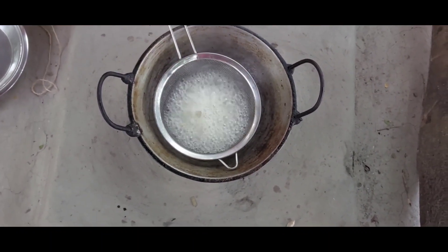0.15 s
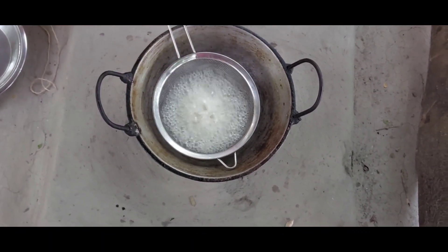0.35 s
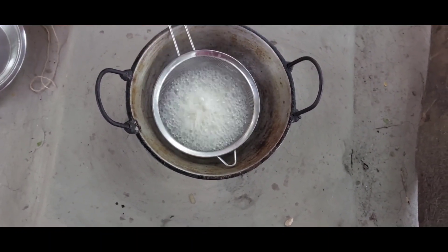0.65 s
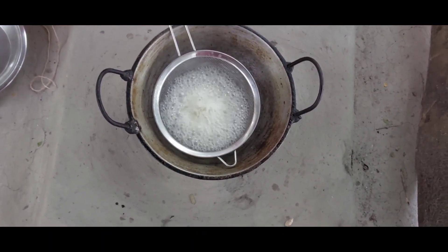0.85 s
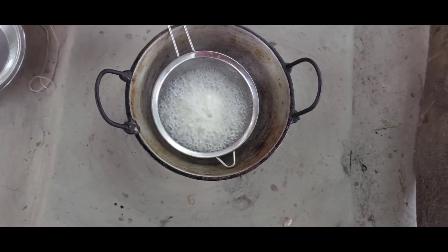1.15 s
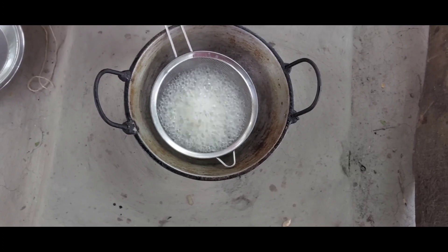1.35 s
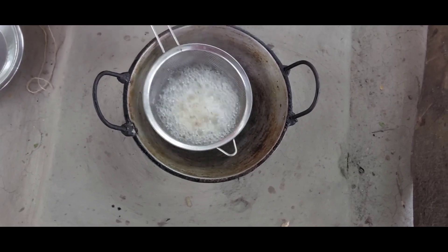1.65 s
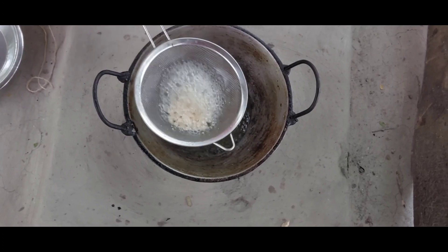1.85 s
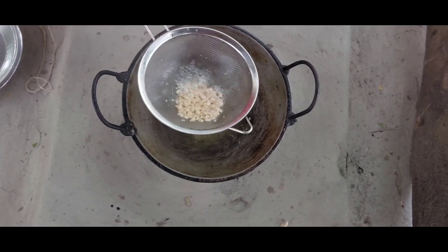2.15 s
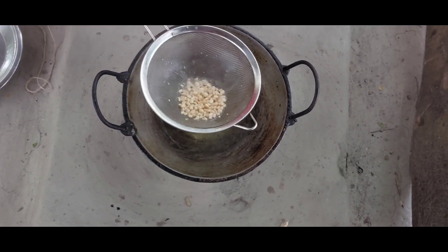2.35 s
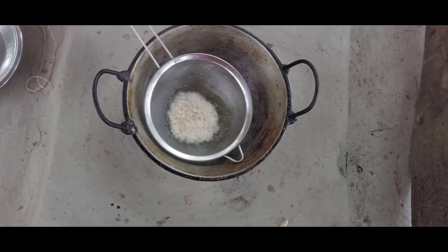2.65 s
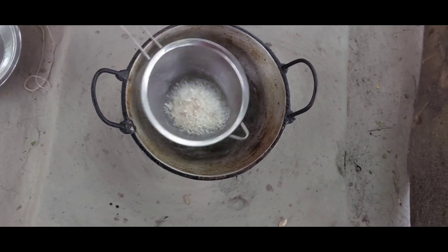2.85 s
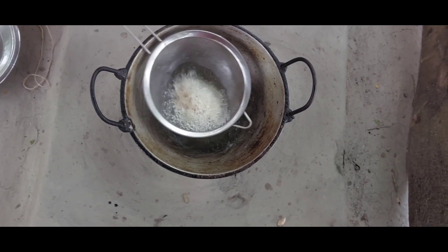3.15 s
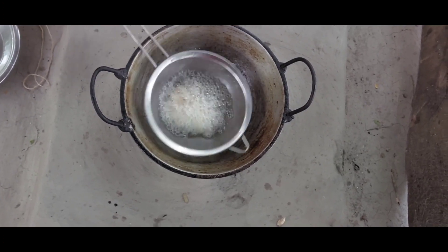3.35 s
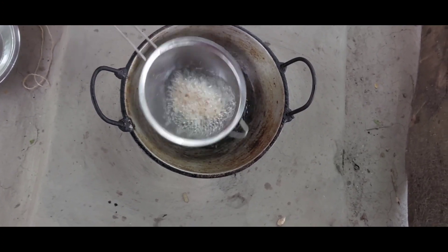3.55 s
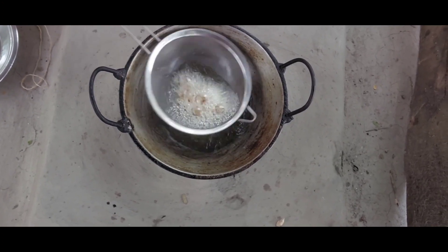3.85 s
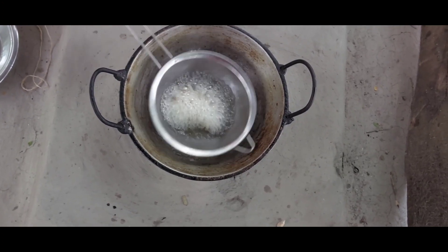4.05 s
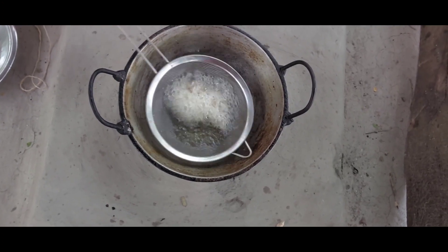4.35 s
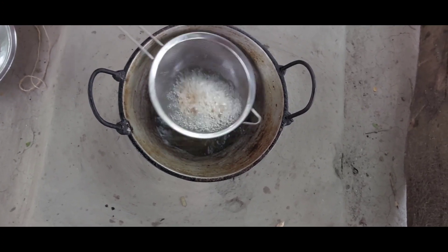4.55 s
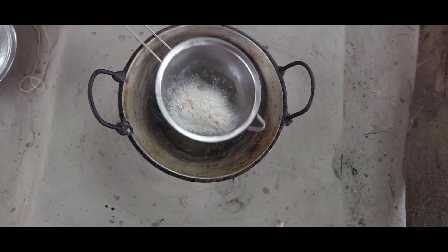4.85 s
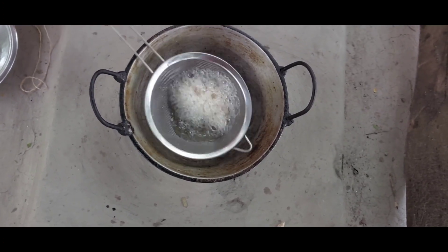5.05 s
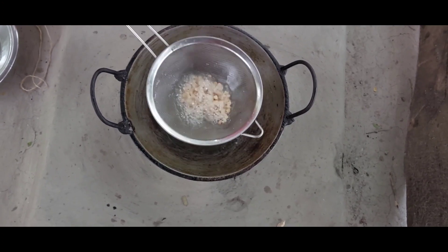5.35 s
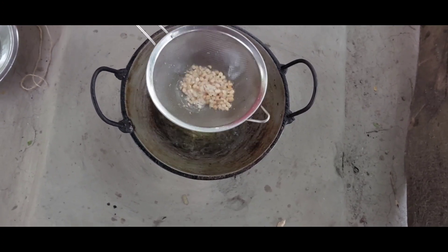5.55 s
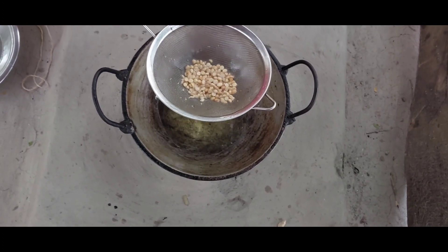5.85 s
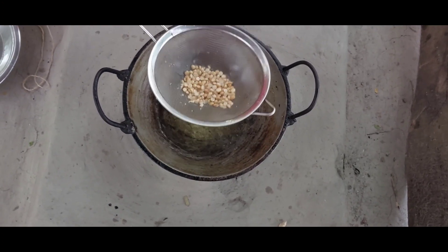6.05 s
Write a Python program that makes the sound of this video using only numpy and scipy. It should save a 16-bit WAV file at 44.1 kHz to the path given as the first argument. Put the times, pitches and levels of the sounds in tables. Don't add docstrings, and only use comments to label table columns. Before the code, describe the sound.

A close, dry, almost mono recording of lentils frying in a wire strainer in an iron pan of oil. From 0 to 1.5 seconds the sizzle is dense and dull, boiling underneath, with many hollow steam-bubble pops, busiest in the first half second and thinning later. At about 1.5 to 1.9 the strainer leaves the oil: a flurry of sharp spits and fine ticks opens into bright, airy fizz. Around 2.2 to 2.45 the rim scrapes metallically, with tiny whistles of steam. From 2.75 to 5 the sizzle drops back to a middle brightness and surges unevenly with shaking; soft low knocks and short rattles come near 2.8, 3.1, 3.4, 3.75, 4.1, 4.4, 4.5 and 4.75. One hard, very loud snap strikes at 4.33. From 5.25 to 6.2 the draining heap hisses brightly and steadily, with minute squeaks. Faint low handling rumble throughout.

```python
import sys
import numpy as np
from scipy import signal
from scipy.fft import rfft, irfft, next_fast_len
from scipy.io import wavfile
from scipy.ndimage import uniform_filter1d, map_coordinates

SR = 44100
rng = np.random.default_rng(int(sys.argv[2]) if len(sys.argv) > 2 else 0)


def pcm_store(signal):
    levels = np.round(np.clip(np.atleast_2d(signal), -1, 1) * 32767)
    wavfile.write(sys.argv[1], SR, levels.astype(np.int16).T)


def ratio_of_db(decibels):
    return 10 ** (np.asarray(decibels, float) / 20)


N = 273861

# (time [s], peak [dB], ring [dB])
PAN_KNOCKS = [(1.488, -65.5, 1), (2.809, -56, 17), (3.076, -65.5, 25), (3.159, -58.5, 19), (3.388, -58, 17),
              (3.725, -57.5, 21), (3.789, -63, 15), (4.115, -58.5, 0), (4.38, -62, -4), (4.499, -58.5, 22),
              (4.755, -63, 23.5), (4.94, -67.5, 2)]
# (delay [half periods], level [dB])
POP_TURNS = [(0, -4), (1, 2.5), (2.1, -7), (3, -9.5)]
# (frequency [Hz], density [dB per Hz])
SPIT_BAND = [(3000, -56), (4100, -3), (4900, -3.5), (6200, -4), (7200, -10), (9500, -29.5)]
# (frequency [Hz], density [dB per Hz])
BODY_BAND = [(700, -66), (1200, -1.5), (1900, -4.5), (2800, -1.5), (3600, -1), (4600, -4), (7000, -36)]


def unit(x):
    return x / np.sqrt(np.mean(x ** 2) + 1e-20)


def along(points, hz):
    f, db = np.transpose(points)
    return ratio_of_db(np.interp(np.log(hz + 1), np.log(f + 1), db, left=-120, right=-120))


def curves(rows):
    s, *columns = np.transpose(rows)
    return [np.interp(np.arange(N) / SR, s, column) for column in columns]


def wobble(rate):
    knots = rng.standard_normal(int(N * rate / SR) + 4)
    return map_coordinates(knots, [np.arange(N) * rate / SR])


def swell(s, half_s):
    t = np.arange(N) / SR
    return np.exp(-((t - np.reshape(s, (-1, 1))) / np.reshape(half_s, (-1, 1))) ** 2)


def filtered(x, response):
    m = 2 * next_fast_len(N // 2 + SR // 16)
    return irfft(rfft(x, m) * response(np.fft.rfftfreq(m, 1 / SR)), m)[..., :N]


def noise(spectrum):
    return filtered(rng.standard_normal(N), lambda f: along(spectrum, f))


def resonance(f, hz, width_hz):
    return 1j * f * width_hz / (hz * hz - f * f + 1j * f * width_hz)


def causal(points, f):
    cepstrum = irfft(np.log(np.maximum(along(points, f), 1e-3)))
    half = len(cepstrum) // 2
    cepstrum[1:half] *= 2
    cepstrum[half + 1:] = 0
    return np.exp(rfft(cepstrum))


def place(s, shapes, early=0):
    at = np.round(s * SR).astype(int)[:, None] + np.arange(shapes.shape[1])
    return np.bincount(at.ravel(), shapes.ravel(), N + 2 * SR)[early:][:N]


def bursts(per_s, spread_db):
    chance, sign, loudness = rng.random((3, N))
    db = np.minimum(-spread_db * np.log(loudness + 1e-9), 4 * spread_db)
    return (chance < per_s / SR) * np.sign(sign - 0.5) * ratio_of_db(db)


def bubbling(spectrum, per_s, spread_db, share, flutter_db):
    grains = unit(bursts(per_s, spread_db))
    hiss = rng.standard_normal(N)
    mix = np.sqrt(share) * grains + np.sqrt(1 - share) * hiss
    return unit(ratio_of_db(flutter_db) * filtered(mix, lambda f: along(spectrum, f)))


def through_bowl(x, hz):
    def response(f):
        total = 0
        for k, (half, db) in enumerate(POP_TURNS):
            total = total - (-1) ** k * ratio_of_db(db) * np.exp(-1j * np.pi * f * half / hz)
        return total
    return filtered(x, response)


def swings(s, db, hz, edge_db):
    t = np.arange(240)[None] / SR - 0.0012
    shapes = 0
    for k, (half, turn_db) in enumerate(POP_TURNS):
        u = t - half / (2 * hz[:, None])
        broad = ratio_of_db(db)[:, None] * np.exp(-(9 * u * hz[:, None]) ** 2)
        edge = ratio_of_db(edge_db)[:, None] * np.cos(2 * np.pi * 2800 * u) * np.exp(-(u / 0.0001) ** 2)
        shapes = shapes - (-1) ** k * ratio_of_db(turn_db) * (broad + edge)
    return filtered(place(s, shapes), lambda f: (1j * f / (1j * f + 215)) ** 3)


def splinters(s, db, band, t60, rag):
    t = np.arange(900) / SR
    fade = ratio_of_db(-60 * t / np.reshape(t60, (-1, 1)))
    shape = np.reshape(rag, (-1, 1)) * rng.standard_normal((len(s), len(t))) * fade
    shape[:, 0] = 1
    width = np.mean(along(band, np.linspace(0, SR / 2, 999)))
    return filtered(place(s, ratio_of_db(db)[:, None] * shape), lambda f: causal(band, f) / width)


def pips(rows, turns, rag, t60, gain_db):
    s, db, hz = np.transpose(rows)[:, :, None]
    lead_s = 0.002
    t = np.arange(300) / SR - lead_s
    grit = uniform_filter1d(rng.standard_normal((len(s), len(t))), size=3)
    wake = grit * (t > 0) * ratio_of_db(-60 * t / t60)
    shapes = (np.exp(-(t * hz / turns) ** 2) + rag * wake) * np.cos(2 * np.pi * hz * t)
    return place(s[:, 0] - lead_s + 1, ratio_of_db(db + gain_db) * shapes, early=SR)


def rim(x):
    return filtered(x, lambda f: resonance(f, 2890, 164))


def steam_and_height():
    # (time [s], steam [dB], height of the lentils [0 sunk, 1 in the air])
    steam_curve = [(0.0, -52.5, 0.063), (0.12, -54, 0.054), (0.38, -57, 0.051), (0.78, -59, 0.094),
                   (1.42, -57.5, 0.17), (1.49, -56.5, 0.13), (1.76, -56.5, 0.58), (1.9, -55, 0.98),
                   (2.5, -53, 0.92), (2.62, -53, 1.08), (2.74, -56.5, 0.51), (3.03, -55.5, 0.44),
                   (4.46, -54, 0.46), (5.17, -56.5, 0.52), (5.26, -53.5, 0.89), (5.5, -52, 1.046),
                   (5.9, -55, 1.056), (6.21, -56, 1.07)]
    # (time [s], added height [1])
    lifts = [
        (1.51, 0.087),
        (2.94, .06),
        (3.6, 0.18),
        (3.92, 0.072),
        (4.22, 0.044),
    ]
    steam_db, height = curves(steam_curve)
    knock_s = np.transpose(PAN_KNOCKS)[0]
    lift_s, lift = np.transpose(lifts)
    toss_s = 0.063
    height = np.clip(height + 0.065 * swell(knock_s - 0.09, toss_s).sum(0), 0, None)
    height = height + lift @ swell(lift_s, toss_s)
    steam_db = steam_db + 1 * swell(knock_s + 0.14, 0.11).sum(0)
    return steam_db, height


def droplet_crackle(fizz_band, mist_band):
    drops = unit(bursts(170, 3.0)) * ratio_of_db(0.64 * wobble(1.9))
    colour = np.clip(0.5 + 2.4 * wobble(90), 0, 1)
    coarse = filtered(drops * colour, lambda f: along(fizz_band, f))
    fine = filtered(drops * (1 - colour), lambda f: along(mist_band, f))
    return unit(coarse + 0.78 * fine)


def seething():
    seethe_band = [(2100, -31), (2600, -1.5), (3550, 0), (4100, -17)]  # (frequency [Hz], density [dB per Hz])
    t = np.arange(N) / SR
    window = np.exp(-((t - 5.46) / 0.26) ** 6)
    return ratio_of_db(-54.5) * window * bubbling(seethe_band, 500, 3.3, 0.14, 2.1 * wobble(30))


def frying():
    # (frequency [Hz], density [dB per Hz])
    deep_band = [(130, -11), (260, 5.5), (400, -12.5), (620, 4.5), (900, -1), (1300, -7), (1800, -31),
                 (2800, -11), (4000, -36)]
    foam_band = [(300, -58), (550, -31), (750, -9.5), (950, -3.5), (1300, -1.5), (1900, -8.5), (2600, -29),
                 (4000, -53)]
    sizzle_band = [(1100, -17.5), (1800, -7.5), (2800, -4), (3600, -3), (4500, -7.5), (6500, -46)]
    fizz_band = [(4500, -33.5), (6500, 1.5), (8000, 1.5), (10300, 0.5), (11500, -8), (13500, -19),
                 (15800, -39)]
    mist_band = [(8000, -40), (10500, -4), (12000, -5), (14000, -6.5), (15800, -11.5)]
    steam_db, height = steam_and_height()

    def level(sunk_db, air_gain_db, bend):
        return ratio_of_db(steam_db + sunk_db + air_gain_db * height ** bend)

    surge = 0.4 * wobble(12) + 0.62 * wobble(45)
    spray = 1.8 * wobble(30) * np.clip(1.25 - height, 0, 1)
    boil = unit(through_bowl(bubbling(deep_band, 220, 3.6, 0.63, surge + 3.1 * wobble(25)), hz=860))
    foam = bubbling(foam_band, 600, 5.1, 0.17, surge + 2.0 * wobble(25))
    sizzle = bubbling(sizzle_band, 700, 3.1, 0.18, surge + 1.38 * wobble(30))
    spit = bubbling(SPIT_BAND, 820, 1.8, 0.24, surge + 0.74 * wobble(30))
    fizz = bubbling(fizz_band, 800, 3.6, 0.25, surge + spray)
    mist = bubbling(mist_band, 990, 4.0, 0.22, surge + spray + 1.5 * wobble(34) + 1.1 * wobble(7))
    crackle = droplet_crackle(fizz_band, mist_band)

    drain = ratio_of_db(8 * swell(1.5, 0.05)[0] + 15 * swell(1.7, 0.13)[0])
    layers = level(-1.4, -33.5, 1.1) * boil
    layers += level(-2.22, -8.5, 2) * foam
    layers += level(0.1, 0.067, 1.05) * sizzle
    layers += level(-13, -24.5, 1.2) * unit(rim(sizzle))
    layers += level(-10.5, 12.1, 0.72) * spit
    layers += level(-17, 18.54, 1.05) * fizz
    layers += level(-20.5, 19.4, 1.8) * drain ** 0.76 * mist
    layers += level(-20, 11.7, 1.23) * drain * crackle
    return layers + seething()


def pops():
    # (time [s], thump [dB], pitch [Hz], body [dB])
    big = [(0.017, -30.5, 1140, 1.5), (0.027, -21, 1150, -31), (0.039, -32, 960, -9),
           (0.066, -32, 1070, -8), (0.082, -28.5, 1220, -0.5), (0.112, -25.5, 800, -29),
           (0.177, -34, 980, -10), (0.182, -31.5, 850, -23), (0.239, -27.5, 900, -4.5),
           (0.254, -26, 1040, -21), (0.317, -29.5, 736, -18), (0.34, -28.5, 860, -20),
           (3.1602, -34, 826, -40), (0.452, -33.5, 1020, -17), (0.509, -32.5, 845, -14),
           (0.53, -32.5, 910, -20), (0.672, -29.5, 990, -38), (0.706, -27, 806, -39),
           (0.728, -32.5, 1070, -6), (0.789, -20.5, 966, -6.5), (0.814, -34, 840, -16),
           (0.905, -31.5, 930, -34), (0.926, -33.5, 960, -15), (0.959, -20, 870, -48),
           (0.964, -34, 865, -10), (1.165, -26, 1030, -24), (1.178, -22.5, 1000, -7.5),
           (1.377, -34, 950, -32), (1.412, -34, 820, -27), (1.561, -27.5, 1050, -13.5)]
    # (time [s], thump [dB])
    plips = [(0.136, -36), (0.143, -34.5), (.169, -34.5), (.206, -36), (.274, -34), (.353, -34.5),
             (.393, -41), (.428, -35), (.483, -40), (.55, -38), (.624, -37.5), (.69, -39.5), (.749, -40.5),
             (0.97, -41), (.999, -42.5), (1.045, -40.5), (1.083, -40.5), (1.091, -43.5), (1.144, -39),
             (1.608, -37)]
    # (time [s], thump [dB], pitch [Hz])
    blips = [(-0.0, -38, 990.0), (0.0039, -33, 1040), (0.0067, -39, 1060), (0.0319, -28.5, 1050),
             (0.046, -34, 940), (0.0512, -35, 1120.0), (0.059, -36, 1100.0), (0.0896, -35, 1060.0),
             (0.0973, -43, 1050), (0.107, -44, 805), (0.1154, -40, 1050.0), (0.1237, -40, 960.0),
             (0.127, -37, 1180.0), (0.1553, -40, 915), (0.197, -42.0, 1050.0), (0.2308, -36, 1090.0),
             (0.236, -42, 1120), (0.2433, -39, 990), (0.2579, -36, 960.0), (0.265, -44, 1000.0),
             (0.267, -40, 1070.0), (0.2878, -48, 990.0), (0.299, -52, 1060.0), (0.337, -31, 1050.0),
             (0.3482, -42, 980.0), (0.3766, -34, 990), (0.404, -42, 1070.0), (0.415, -35, 900.0),
             (0.431, -39.5, 1080.0), (0.46, -38.5, 770), (0.489, -46, 1110.0), (0.526, -40, 1020.0),
             (0.6063, -44, 980.0), (0.6206, -39, 950.0), (0.6323, -44.0, 1060.0), (0.647, -44, 920.0),
             (0.682, -44, 950.0), (0.752, -45, 960.0), (0.7592, -42, 940.0), (0.7956, -38, 1040.0),
             (1.0392, -42, 825), (1.1877, -42, 1040.0), (1.1936, -45, 1220), (1.2479, -47, 1190.0),
             (1.3915, -41, 900)]
    rows = list(big)
    rows += [(s, db, 850, -7) for s, db in plips]
    rows += [(s, db + 0.5, hz, -15) for s, db, hz in blips]
    s, db, hz, body_db = np.transpose(rows)
    crack_db = -18.5 + 0.42 * body_db
    thump = swings(s, db + 2.0, hz, db + body_db - 2.5)
    tail = splinters(s + 0.001567, db + body_db - 6.0, BODY_BAND, t60=0.014, rag=0.78)
    crack = splinters(s + 0.001083, db + crack_db + 3, SPIT_BAND, t60=0.0028, rag=0.58)
    return thump + tail + ratio_of_db(-5.5) * rim(thump + tail) + crack


def crackling():
    # (time [s], peak [dB], pitch
    # [Hz])
    skins = [(0.0321, -38, 2980.0), (0.0474, -51, 2710.0), (0.12, -36, 3360), (0.27, -41.5, 2920.0),
             (0.3, -44.0, 2980.0), (0.319, -35.5, 2600.0), (0.3388, -38, 2990.0), (0.4165, -45, 2790.0),
             (0.433, -45, 2780.0), (0.4618, -41, 2970), (0.5265, -35, 4620), (0.5341, -47, 3130.0),
             (0.6267, -34, 3040), (0.676, -46, 2660.0), (0.9724, -38, 2620.0), (1.0512, -42, 2920.0),
             (1.1459, -40.5, 3070.0), (1.6484, -39, 4170), (1.6871, -34, 4760.0), (1.7022, -41, 3060),
             (1.7283, -28.5, 1930), (1.7724, -38, 4520.0), (2.1237, -36, 4550), (2.4781, -32, 4180.0),
             (2.586, -45, 5030.0), (2.6676, -37, 3070), (2.6723, -34.5, 3280), (3.5148, -35, 4350),
             (3.7263, -44, 2820.0), (4.1151, -25, 4200), (0.1841, -39, 5200), (0.4874, -41, 5300),
             (1.5934, -39, 4700), (2.213, -38, 5000), (5.3563, -42, 3030), (6.176, -38, 5250),
             (4.505, -24.5, 4320), (4.8021, -46, 3380), (4.8132, -35.5, 3280)]
    # (time [s], peak [dB], pitch [Hz])
    ticks = [(0.0027, -43, 11670.0), (0.0111, -43, 10270.0), (0.0163, -49, 10180.0),
             (0.0758, -52.0, 9640.0), (0.1027, -54.0, 12040.0), (0.1079, -44, 11280.0),
             (0.1515, -38.5, 9200), (0.1676, -48, 11630.0), (0.2139, -51, 11720.0), (0.2409, -44, 9070.0),
             (0.2752, -47, 9630.0), (0.3248, -49, 10950.0), (0.3981, -49, 12520.0), (0.469, -50, 11120.0),
             (0.4803, -48, 10820.0), (0.7902, -49, 8110.0), (1.0301, -49, 11090.0), (1.0961, -55, 9500.0),
             (1.1344, -42.5, 10020.0), (1.4394, -56.5, 9500.0), (1.4643, -52.0, 10080.0),
             (1.5621, -46.5, 12110.0), (1.572, -49.5, 10910.0), (1.5753, -50.0, 11080.0),
             (1.5801, -41, 12300), (1.5923, -46, 9010.0), (1.6028, -50.0, 10890.0), (1.6485, -52, 10430.0),
             (1.652, -51, 12400.0), (1.6702, -36, 11070.0), (1.6931, -38, 9800), (1.6983, -52, 11700.0),
             (1.7258, -40, 10200), (1.732, -44.5, 12990.0), (1.7369, -40.5, 11640.0),
             (1.7517, -41, 13220.0), (1.7771, -50, 10920.0), (1.7858, -35, 10500), (1.8161, -39.0, 10670.0),
             (1.8648, -44.0, 9900), (1.8985, -38.0, 12580.0), (2.0903, -38, 10780.0), (2.1238, -44, 9100),
             (2.7676, -42, 12060.0), (2.8102, -56, 9440.0), (3.0423, -50, 10980.0), (3.2898, -62.5, 11100),
             (3.3097, -47.5, 10990.0), (3.4098, -47.5, 10240.0), (3.64, -42, 11210.0),
             (3.8536, -53, 11790.0), (3.9768, -44, 11060.0), (4.4365, -48, 12100), (4.5051, -54, 9680.0),
             (4.5718, -49.0, 10160.0), (5.4638, -46, 10000.0), (6.087, -41.0, 9900)]
    # (time [s], peak [dB])
    specks = [(0.2713, -53), (0.2907, -57), (0.3444, -55), (1.7094, -45), (1.8497, -44), (1.9854, -33),
              (2.2942, -47), (3.1657, -56), (3.487, -53), (3.4984, -44), (3.6204, -44), (3.7459, -51),
              (3.9285, -49), (4.0831, -50), (4.4084, -51), (4.6284, -50), (4.6598, -49)]
    # (time [s], level [dB])
    clumps = [(2.915, -62), (3.21, -58), (3.56, -58), (3.74, -56), (4.25, -53.5), (4.48, -61),
              (4.635, -53.5), (4.82, -60), (5.0, -58.5), (5.09, -57)]
    clump_band = [(880, -32), (1080, -3), (1350, -3), (1750, -25)]  # (frequency [Hz], density [dB per Hz])
    clump_s, clump_db = np.transpose(clumps)
    gurgle = bubbling(clump_band, 400, 3, 0.37, 1.2 * wobble(60))
    small = ratio_of_db(clump_db) @ swell(clump_s, 0.029) * gurgle
    pitched_specks = [(s, db, 12900 * rng.normal(1, 0.05)) for s, db in specks]
    small += pips(skins, turns=1.0, rag=0.21, t60=0.0074, gain_db=0.0)
    small += pips(pitched_specks, turns=1.2, rag=0.6, t60=0.004, gain_db=3.0)
    return small + pips(ticks, turns=0.9, rag=0.8, t60=0.0044, gain_db=5.0)


def handling():
    # (time [s], half length [s], rumble [dB])
    sways = [(0.0, 0.17, -70.5), (0.55, 0.065, -64.5), (0.92, 0.11, -70), (1.234, 0.05, -66),
             (2.466, 0.098, -73), (3.56, 0.056, -65), (4.41, 0.049, -65), (4.588, 0.038, -60),
             (4.834, 0.058, -65.5), (5.297, 0.048, -73)]
    # (time [s], peak [dB], pitch [Hz])
    grips = [(0.519, -71, 59.2), (0.928, -59, 51.1), (1.202, -62, 72.7), (1.64, -70, 130),
             (2.444, -55, 113), (3.566, -69, 67.6), (3.79, -65.5, 138), (4.357, -62, 73.4)]
    # (frequency [Hz], density [dB per Hz])
    rumble_band = [(15, -57), (30, -19), (45, -3), (58, -1.5), (75, -9.5), (110, -14.5), (200, -26)]
    air_band = [(50, -35), (100, -2), (170, -9), (300, -7.5), (500, -12.5), (800, -40)]
    rumble = unit(noise(rumble_band))
    air = unit(ratio_of_db(4.5 * wobble(26)) * noise(air_band))
    s, db, hz = np.transpose(grips)
    t = np.arange(SR // 8) / SR
    decay = ratio_of_db(db[:, None] + 10.5 - 60 * t / 0.045)
    bumps = decay * np.sin(2 * np.pi * hz[:, None] * t) * (1 - np.exp(-t / 0.0012))
    sway_s, half_s, sway_db = np.transpose(sways)
    shaking = ratio_of_db(-78.5) + ratio_of_db(sway_db) @ swell(sway_s, half_s)
    return shaking * rumble + ratio_of_db(-88.5) * air + place(s, bumps)


def spits():
    # (time [s], crack [dB], size [0-1], snap [dB])
    droplets = [(1.4825, -44, 0.1, -10), (1.494, -50.5, .1, -1), (1.5015, -29.5, 0.36, -36),
                (1.6357, -38, 0.47, -17), (1.6646, -25.5, 0.25, -13.5), (1.6734, -30, 0, -14),
                (1.7275, -32.5, 0.94, -12), (1.7639, -33.5, 0.58, -3), (1.7704, -32, 0.1, -12),
                (1.8148, -45, .15, -10), (1.8971, -45, 0.2, -8), (1.926, -41, .28, -1),
                (1.9854, -23.5, 0.45, -20), (2.0527, -27.5, 0.76, -21), (2.0814, -35, 0.6, -16),
                (2.1226, -32, 0, -21), (2.2114, -45.5, 0.93, -3), (2.5795, -28, 0.26, -23),
                (2.6973, -22, 0.24, -14), (2.8848, -45, 0.4, -4), (1.686, -37, 0.2, -13),
                (3.264, -41, 0.74, 7), (3.3064, -38, 0.1, -14), (3.5089, -35, 0.4, -15),
                (3.5738, -41.5, 0.5, -1), (3.7199, -42, 0.85, -3), (4.2562, -47, 0.97, -1),
                (4.3251, -26.5, 0.3, -3.5), (4.3354, -41, 0.1, -3), (4.4814, -45.5, .1, 0)]
    # (time [s], crack [dB], size [0-1], snap [dB])
    rattles = [(2.808, -33.5, 0.44, -31), (2.8629, -49.5, 0.94, -24), (3.073, -32, 0.34, -28),
               (3.3852, -33, 0.54, -25), (3.7267, -39, 0.79, -21), (4.104, -26, 0.03, -40),
               (4.116, -23.5, 0.3, -29), (4.3814, -33.5, 0.85, -21), (4.5028, -31, 0.35, -38),
               (4.7086, -50, 1, -21), (4.7575, -47, 1, -20), (4.788, -39.5, 0.5, -29)]
    # (frequency [Hz], density [dB per Hz])
    snap_band = [(4500, -30), (6500, 2.5), (8000, -2), (10300, 4), (13000, -3), (15800, -7), (15950, -31),
                 (16600, -33)]
    s, db, size, snap_db = np.transpose(list(droplets) + list(rattles))
    thump_db = -53.5 + 54 * size
    body_db = -24.5 + 25 * size
    rattle = np.arange(len(s)) >= len(droplets)
    t60 = np.where(rattle, 0.016, 0.003)
    rag = np.where(rattle, 0.8, 0.2)
    db = db + np.where(rattle, -7, 1.5)
    thump = swings(s, db + thump_db + np.where(rattle, 8, 1.5), np.full(len(s), 1000), db - 64)
    body = splinters(s + 0.001187, db + body_db + 7.0, BODY_BAND, 1.65 * t60, rag)
    crack = splinters(s + 0.00127, db - 5.0, SPIT_BAND, t60, rag)
    snap = splinters(s + 0.0012, db + snap_db + 11.5, snap_band, 1.2 * t60, rag)
    return thump + body + crack + snap


def ring(modes, t):
    total = 0
    for hz, db, t60 in modes:
        decay = ratio_of_db(db + rng.normal(0, 2.9) - 60 * t / t60)
        total = total + decay * np.sin(2 * np.pi * hz * rng.normal(1, 0.0374) * t)
    return total


def knocks():
    # (frequency [Hz], level [dB], t60 [s])
    low_modes = [(225, -3, 0.15), (250, 0, 0.21), (275, 0, 0.22), (351, 3, 0.14), (387, -3.5, 0.55),
                 (443, -10, 0.13)]
    high_modes = [(840, -16, 0.08), (1050, 1, 0.052), (1226, 4, 0.056), (1540, -8, 0.027)]
    # (frequency [Hz], density [dB per Hz])
    slosh_band = [(90, -41), (170, -0.5), (240, 2.5), (400, -0.5), (520, -9), (900, -40)]
    blows, shake = np.zeros(N + SR), np.zeros(N + SR)
    t = np.arange(SR // 2) / SR
    for s, db, ring_db in PAN_KNOCKS:
        start = round(s * SR)
        blow = ratio_of_db(db - 13.0) * (ring(low_modes, t) + ratio_of_db(ring_db + 4.0) * ring(high_modes, t))
        blows[start:][:len(t)] += blow * (1 - np.exp(-t / 0.0033))
        shake[start:][:len(t)] += ratio_of_db(db - 9.0 - 60 * t / 0.5)
    return blows[:N] + shake[:N] * unit(noise(slosh_band))


def scrape():
    # (frequency [Hz], width [Hz], level [dB], caught at [s])
    wires = [(3200, 360, -10, 2.45), (4760, 190, 4, 2.34), (6120, 260, 2, 2.33), (8300, 500, -0.5, 2.3),
             (10300, 1600, 0, 2.225), (12800, 980, -17, 2.27)]
    # (time [s], length [s], level [dB])
    drags = [
        (2.21, 0.21, -49),
        (2.572, .03, -65),
    ]
    rubbing = np.zeros(N)
    for hz, width_hz, db, caught_s in wires:
        slip_db = db + 7 * swell(caught_s, 0.034)[0] + 1.8 * wobble(90)
        slips = ratio_of_db(slip_db) * rng.standard_normal(N)
        rubbing += filtered(slips, lambda f: resonance(f, hz, width_hz))
    t = np.arange(N) / SR
    drag = np.zeros(N)
    for s, length, db in drags:
        attack = np.clip((t - s) / 0.0078, 0, 1)
        drag += attack * ratio_of_db(db - 216 * np.maximum(t - s - length, 0))
    jolt_db = 7 * swell((2.272, 2.313, 2.345), 0.0035).sum(0)
    return drag * ratio_of_db(jolt_db) * unit(rubbing)


def squeaks():
    # (middle [s], peak [dB], pitch [Hz], length [s])
    tones = [(2.257, -55, 837, 0.02), (2.296, -48, 900, 0.0077), (2.349, -59.5, 806, 0.038),
             (2.455, -52, 3200, 0.047), (3.41, -56, 860, .05), (5.665, -54, 2200, .012),
             (5.698, -52, 2190, .014), (5.767, -64, 760, 0.042), (5.882, -54, 1100, 0.0082),
             (5.978, -55, 1050, 0.013)]
    s, db, hz, length = np.transpose(tones)[:, :, None]
    t = np.arange(SR // 10) / SR - 0.05
    waver = np.cumsum(0.068 * rng.standard_normal((len(s), len(t))), axis=1)
    tone = np.sin(2 * np.pi * hz * t + waver) * np.exp(-(2 * t / length) ** 2)
    return place(s[:, 0] - 0.05, ratio_of_db(db) * tone)


def bang():
    # (time [s], peak [dB], pitch [Hz])
    burst = [
        (4.3263, -9.5, 5100),
    ]
    click = pips(burst, turns=0.6, rag=0.1, t60=0.004, gain_db=0)
    return filtered(click, lambda f: f ** 4 / (f ** 4 + 800.0 ** 4))


def bowl_dips(x):
    # (frequency [Hz], width [Hz], depth [dB])
    dips = [(264, 207, -13.5), (4180, 950, -9.5), (6794, 780, -10)]

    def response(f):
        total = 1
        for hz, width_hz, db in dips:
            stiff = hz * hz - f * f
            total = total * (stiff + 1j * f * width_hz * ratio_of_db(db)) / (stiff + 1j * f * width_hz)
        return total
    return filtered(x, response)


def scene():
    # (frequency [Hz], side over mid [dB])
    ports = [(30, -23), (400, -28.5), (1300, -62), (4400, -52), (16000, -21.5)]
    steady = filtered(frying() + crackling() + scrape(), lambda f: f < 15890)
    mid = bowl_dips(steady + pops() + spits() + squeaks() + bang()) + handling() + knocks()
    mid = filtered(mid, lambda f: f < 16650)
    side = filtered(mid, lambda f: 1j * along(ports, f))
    return np.array([mid + side, mid - side])


def top_cut(x):
    return signal.sosfilt(signal.butter(12, 16670, fs=SR, output="sos"), x)


def record(dry):
    return top_cut(dry)


dry = scene()
out = record(dry)
pcm_store(out)
```